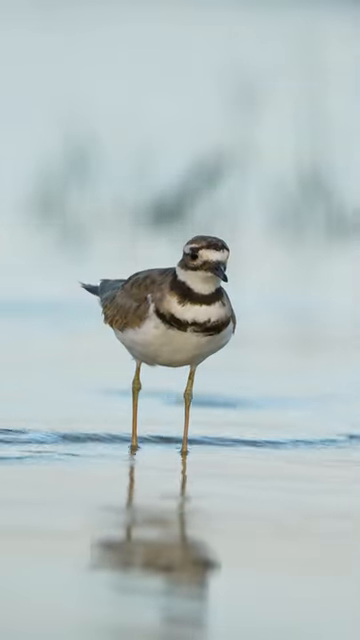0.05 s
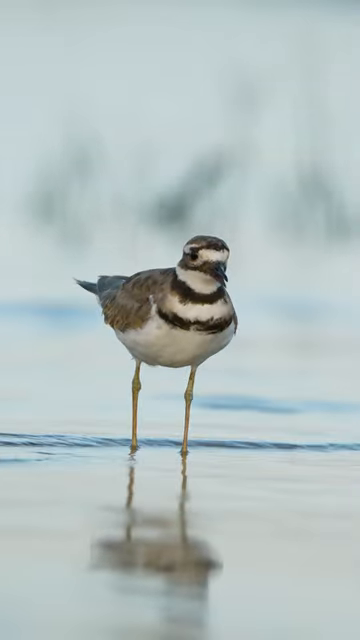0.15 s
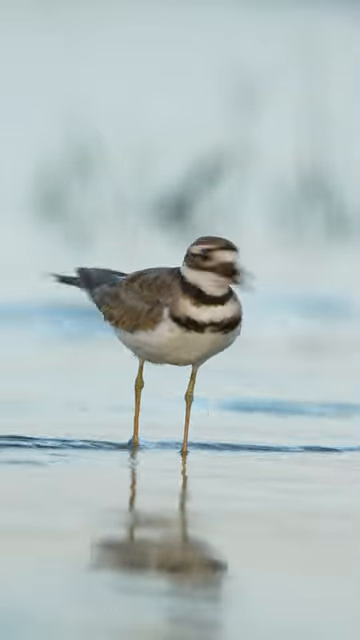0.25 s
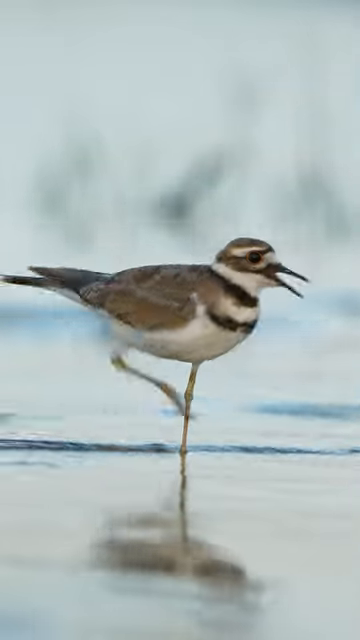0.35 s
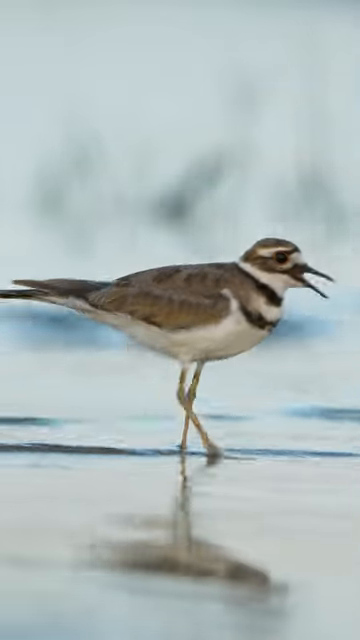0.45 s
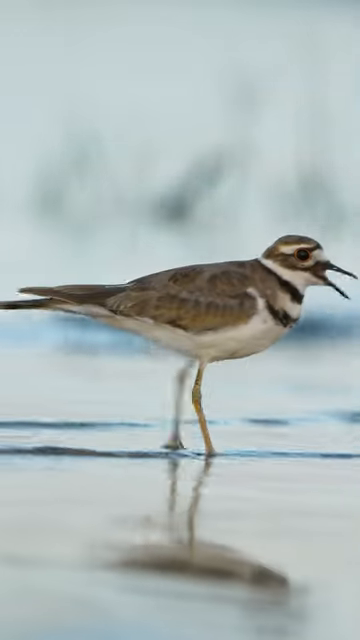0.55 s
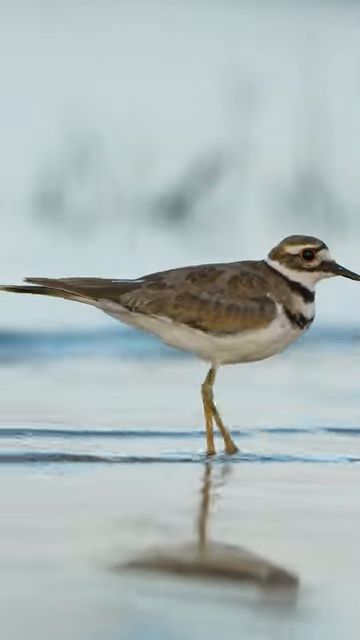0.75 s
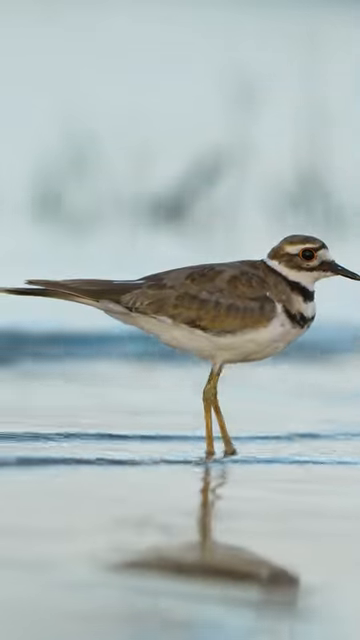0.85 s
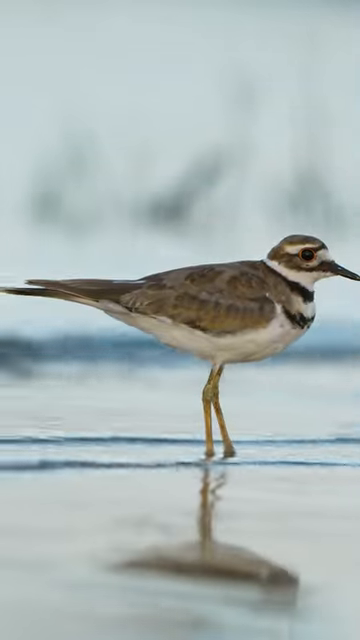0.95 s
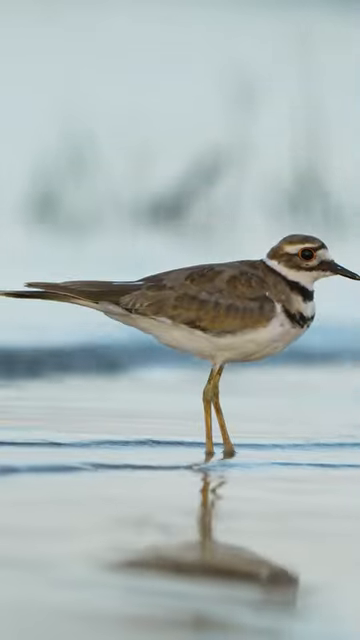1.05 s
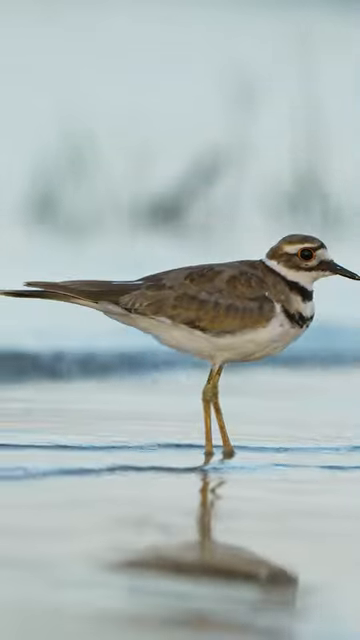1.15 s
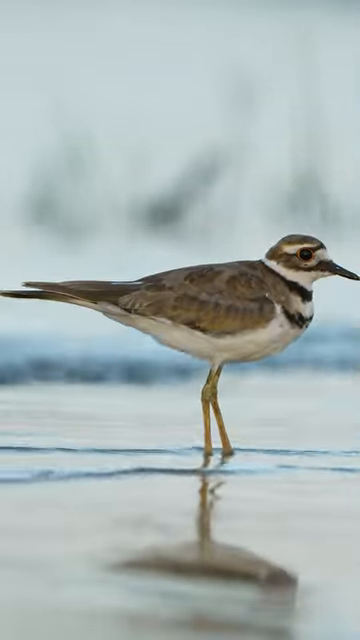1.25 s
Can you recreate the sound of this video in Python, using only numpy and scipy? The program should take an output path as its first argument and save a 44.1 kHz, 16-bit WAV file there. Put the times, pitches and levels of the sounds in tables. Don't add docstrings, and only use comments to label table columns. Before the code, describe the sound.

Quiet shore air with a faint low hum, high pulsing insects on the right and a barely audible fading earlier call. At 0.23 seconds a close shorebird whistles loudly, flicking up, dipping, then rising steadily until an abrupt stop at 0.64. A short outdoor tail follows, with tiny drips and rasps. From 1.03 to 1.3 a distant bird answers faintly as a small wave swells left.

```python
import sys
import numpy as np
from scipy import signal
from scipy.fft import rfft, irfft
from scipy.io import wavfile
from scipy.ndimage import uniform_filter1d

SR = 44100
rng = np.random.default_rng(int(sys.argv[2]) if len(sys.argv) > 2 else 0)


def log_audio(samples):
    frames = np.atleast_2d(samples).T
    limited = np.clip(frames, -1, 1)
    pcm = np.round(limited * 32767).astype(np.int16)
    wavfile.write(sys.argv[1], SR, pcm)


def natural_amplitude(level_db):
    exponent = np.asarray(level_db, float) / 20
    return 10 ** exponent


N = 57330
T = np.arange(N) / SR
F = np.fft.rfftfreq(N, 1 / SR)


def read(table, hz):
    a = np.array(table, float)
    return np.interp(np.log(hz + 1), np.log(a[:, 0] + 1), a[:, 1])


def level(x, db):
    return x * natural_amplitude(db) / np.sqrt(np.mean(x ** 2))


def walk(rate):
    k = int(SR / rate)
    return level(uniform_filter1d(uniform_filter1d(rng.standard_normal(N), k), k), 0)


def sides(pan_db):
    g = natural_amplitude(np.array([pan_db / 2 + 0 * T, -pan_db / 2 + 0 * T]))
    return 2 * g / g.sum(axis=0)


def coloured(gain):
    return irfft(rfft(rng.standard_normal(N)) * gain, N)


def band(hz, width_hz):
    return level(coloured(np.exp(-.5 * ((F - hz) / width_hz) ** 2)), 0)


def air():
    # (f/Hz, level/dB)
    spectrum = [(40, -47), (137, -7.5), (250, -13), (400, -21.5), (2000, -28.5), (3300, -32), (4450, -29),
                (7000, -26)]
    # (f/Hz, correlation/-1..1)
    likeness = [(60, 1), (130, 1.0), (290, 0.7), (640, 0), (1410, 0.3), (3100, -0.43), (6820, 0.05),
                (15000, -0.19)]
    # (f/Hz, left over right/dB)
    balance = [(60, -2), (110, 1.5), (200, -1), (380, 4.5), (700, 1), (1290, 5), (2380, 0.5), (4400, 1),
               (8120, 1.5), (15000, -12.0)]
    gain = natural_amplitude(read(spectrum, F)) * (F < 7000)
    like = np.clip(read(likeness, F), -.9, .999)
    lean = natural_amplitude(read(balance, F) / 2 * (F > 200))
    mid, side = rfft(rng.standard_normal((2, N))) * gain * np.sqrt([1 + like, 1 - like])
    wash = irfft(np.array([(mid + side) * lean, (mid - side) / lean]), N)
    return level(wash, -55) * natural_amplitude(0.12 * walk(4))


def pump():
    # (f/Hz, level/dB)
    tones = [(138.6, -53), (175.4, -62.5), (258, -72), (297, -74), (448, -79), (696, -82)]
    hum = 0
    for hz, db in tones:
        turns = hz * np.cumsum(1 + 0.0046 * walk(28)) / SR
        hum = hum + np.sqrt(2) * natural_amplitude(db + 1.2 * walk(17)) * np.sin(2 * np.pi * turns)
    return hum


def insects():
    # (f/Hz, level/dB)
    spectrum = [(3530, -41), (6000, -19.5), (7010, -14), (8330, -6.5), (9700, 0), (12000, -4),
                (12900, -12.5), (14900, -7), (16000, -20)]
    # (t/s, level/dB, f/Hz)
    rasps = [
        (.032, -57, 11800),
        (.105, -57, 11500),
        (.68, -58, 11500),
        (.718, -57, 12300),
        (.763, -54, 12350),
        (.82, -54, 12100),
        (.886, -56, 12500),
        (.956, -57, 12200),
        (1.04, -59, 11500),
    ]
    throb_hz, throb_db, throb_peak_s = 20.85, 2.5, .44
    rasp_s = 0.0033
    gain = natural_amplitude(read(spectrum, F)) * (F > 6000)
    beat = np.cos(2 * np.pi * throb_hz * (T - throb_peak_s) + .3 * walk(3))
    throb = natural_amplitude(throb_db * beat + 1.3 * walk(70))
    chorus = level(np.array([coloured(gain), coloured(gain)]) * throb, -50)
    near = 0
    for s, db, hz in rasps:
        near = near + natural_amplitude(db) * np.exp(-.5 * ((T - s) / rasp_s) ** 2) * band(hz, 500)
    return (chorus + near) * sides(-11.5)


def wave():
    wave_db, thud_db = -52.5, -56
    peak_s, rise_s = 1.375, 0.14
    hz, width_hz = 1284, 750
    swell = natural_amplitude(wave_db + 3.0 * walk(38)) * np.exp(-.5 * (np.minimum(T - peak_s, 0) / rise_s) ** 2)
    splash = swell * np.array([band(hz, width_hz), band(hz, width_hz)]) * sides(8.2)
    return splash + swell * natural_amplitude(thud_db - wave_db) * band(380, 120)


def drips():
    # (t/s, level/dB, f/Hz, ring/s)
    drops = [(.445, -55.5, 672, .006), (.46, -66, 2950, .01), (.768, -62, 1750, .005),
             (.818, -60, 1760, .003), (.828, -60, 1720, .003), (.92, -59.5, 861, .005),
             (1.05, -60.5, 1750, .007), (1.088, -62, 2050, .002), (1.0952, -54, 2342, .0014),
             (1.122, -63, 1900, .002), (1.13, -59, 696, .012), (.745, -57, 300, .015),
             (.085, -62, 1000, .008)]
    out = 0
    for s, db, hz, ring in drops:
        u = np.maximum(T - s, 0) / ring
        pluck = u * np.exp(1 - u)
        out = out + natural_amplitude(db) * pluck * np.sin(2 * np.pi * hz * ring * u * (1 + 0.0022 * u))
    return out


def shore(x):
    # (f/Hz, level/dB)
    colour = [(1000, 4), (2200, 8.5), (3500, 0), (5500, 0), (6800, 5), (9000, 7), (14000, 8)]
    bank_s, bank_db = .185, -50
    t = T[:SR // 2]
    x = irfft(rfft(x) * natural_amplitude(read(colour, F)), N)

    def tail(db, t60):
        decay = natural_amplitude(db - 60 * t / t60) / np.sqrt(t60 * SR / 14)
        return decay * rng.standard_normal((2, len(t))) * (t > .003)

    reeds, ground = tail(-20, .1), tail(-33, .44)
    wet = signal.fftconvolve(x, reeds + ground, axes=1)[:, :N]
    lag = int(bank_s * SR)
    return wet + natural_amplitude(bank_db) * np.pad(x, ((0, 0), (lag, 0)))[:, :N]


def faint_swell():
    return natural_amplitude(-66) * band(4620, 100) * np.interp(T, [.06, .228, .247], [0, 1, 0])


def bird(parts, low_db=0.):
    # (number, level/dB, share of brightness, share of head turn)
    voice = [(1, -20.5, .2, 0.086), (2, 1.5, 0.074, 0.99), (3, -29.5, 1, 1), (4, -37.5, 2.5, .9),
             (5, -48.5, .5, .9), (6, -31, .6, 0.88), (7, -36.5, .6, .9), (8, -47, .5, .9)]
    # (f/Hz, level/dB)
    throat = [(7500, -0.89), (9400, -0.1), (11300, -3), (12500, -3), (14000, -4.5), (15500, -1.5)]
    # (f/Hz, width/Hz, level/dB)
    resonances = [(2005, 37, 3.5), (2070, 51, -2), (6030, 130, -8), (11700, 200, -10), (12840, 60, -10),
                  (13470, 50, -9), (13800, 180, -2.5), (14550, 90, -8), (15890, 50, -25.5), (12970, 90, -3)]
    edge_s, wobble, shimmer_db = .0015, .0006, .17
    rasp_db, rasp_hz, rasp_end_s, rasp_fade_s, break_db = -25, 700, .026, .01, 2.6
    ear_lag_s = 8e-6
    s, hz, db, pan, bright = np.concatenate([np.array(p, float) for p in parts]).T

    def line(v):
        return uniform_filter1d(np.interp(T, s, v), int(edge_s * SR) + 1)

    def beak(f):
        return sum(d * np.exp(-.5 * ((f - c) / w) ** 2) for c, w, d in resonances)

    f0 = line(hz) / 2 * (1 + wobble * walk(78))
    phase = 2 * np.pi * (np.cumsum(f0) / SR + f0 * ear_lag_s * np.array([[.5], [-.5]]))
    gate = np.clip((T - s[0]) / edge_s + 1, 0, 1) * np.clip((s[-1] - T) / edge_s + 1, 0, 1)
    start = np.clip((s[0] + rasp_end_s - T) / rasp_fade_s, 0, 1)
    hoarse = 1 + natural_amplitude(rasp_db) * band(0, rasp_hz) * start
    whistle = 0
    for k, harmonic_db, share, turn in voice:
        gain_db = harmonic_db + low_db * (k == 1) + share * line(bright)
        gain_db = gain_db + beak(k * f0) + read(throat, k * f0)
        gain_db = gain_db + shimmer_db * (k / 2) ** 2 * walk(41) + break_db * (k - 2) * start * walk(250)
        whistle = whistle + natural_amplitude(gain_db) * np.sin(k * phase) * sides(turn * line(pan))
    return np.sqrt(2) * whistle * natural_amplitude(line(db)) * gate * hoarse


def far_bird():
    # (t/s, second harmonic f/Hz, level/dB, left over right/dB, brightness/dB)
    answer = [
        [(1.035, 4730, -40, 4, 0), (1.048, 4864, -40.5, 5, 0), (1.0575, 4735, -34, 9, 0),
         (1.0612, 4620, -43, 0, 0), (1.0635, 4570, -37.5, 7, 0), (1.071, 4350, -50, -0.5, 0),
         (1.078, 4200, -50, 7, 0.0042), (1.09, 4270, -68, -1.5, 0)],
        [(1.101, 4270, -66, 7, 0), (1.108, 4256, -56.5, -2, 0), (1.12, 4256, -56.5, 3.5, 0),
         (1.17, 4306, -54.5, -6, 0.017), (1.299, 4353, -53, -1, 0.015)],
    ]
    return bird(answer, -5)


def near_bird():
    # (t/s, second harmonic f/Hz, level/dB, left over right/dB, brightness/dB)
    flick = [
        (.2285, 4373, -21, -2, 2.5),
        (.232, 4643, -13.5, 5, 0),
        (.241, 4729, -9, 3.5, -1.5),
        (.25, 4608, -12, -0.5, 4.5),
        (.258, 4293, -14, -7, 4.5),
        (.2622, 4020, -17.5, 3, -1.5),
        (.2655, 3947, -18.5, 0.5, 2.5),
        (.276, 3915, -17, 1, 0.5),
    ]
    hold = [
        (0.286, 3970, -18.5, -1, 0),
        (0.318, 4111, -18, 1.5, 0),
        (0.4, 4210, -21, 6.5, 0),
        (0.444, 4310, -15.5, -2, 0),
        (0.55, 4394, -16.5, -3.0, 0.001),
        (0.614, 4554, -14, -4.5, 0.00032),
        (0.632, 4495, -12, -2.5, 0.0023),
    ]
    release = [
        (0.636, 4404, -14.5, -3, 0),
        (0.6402, 4327, -22.5, -4, 0),
        (0.643, 4240, -36, -3, 0),
    ]
    return bird([flick, hold, release])


def scene():
    floor = air() + pump() + insects() + wave() + drips()
    birds = near_bird() + far_bird()
    return floor + faint_swell() + shore(birds) + birds


def top_cut(x):
    return signal.sosfilt(signal.butter(12, 16520, fs=SR, output="sos"), x)


def record(dry):
    low_pass = signal.ellip(8, .1, 60, 15850, fs=SR, output="sos")
    mix = signal.sosfiltfilt(low_pass, dry)
    return top_cut(mix)


dry = scene()
out = record(dry)
log_audio(out)
```